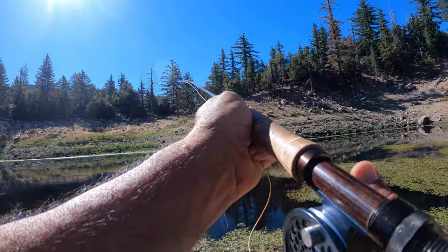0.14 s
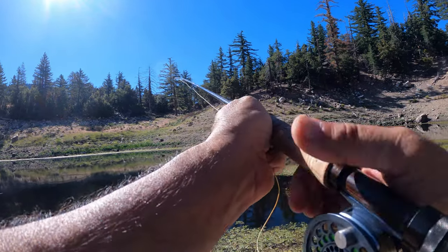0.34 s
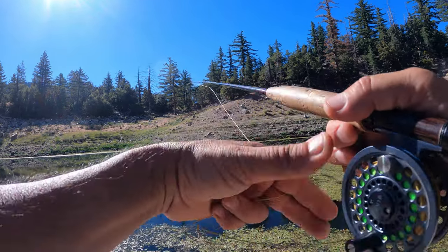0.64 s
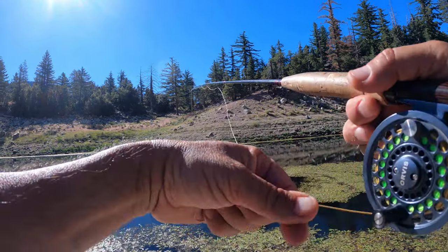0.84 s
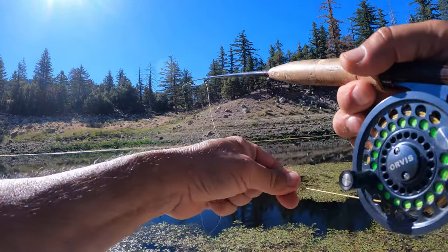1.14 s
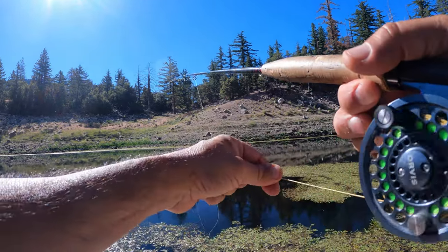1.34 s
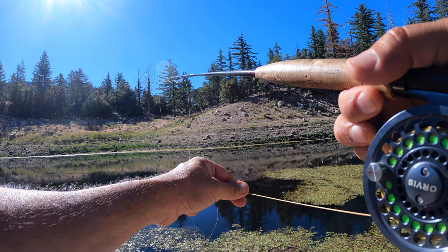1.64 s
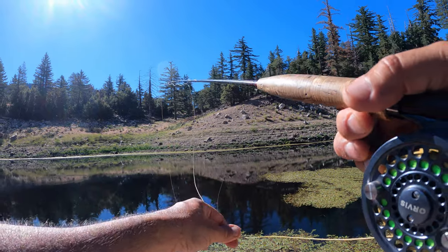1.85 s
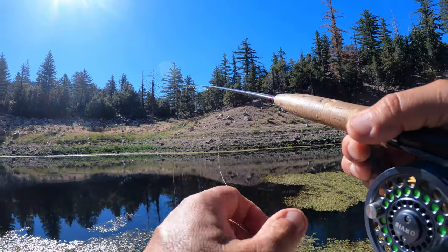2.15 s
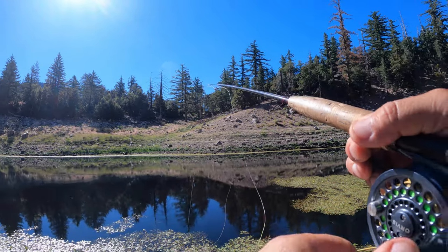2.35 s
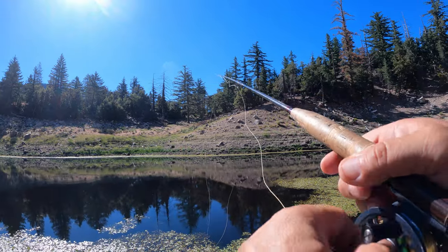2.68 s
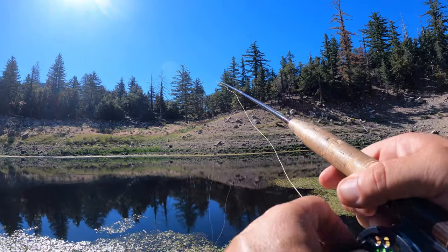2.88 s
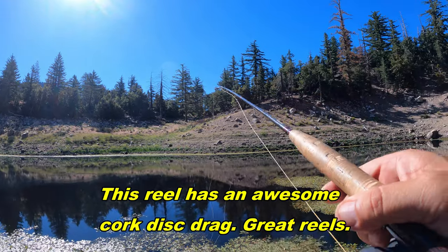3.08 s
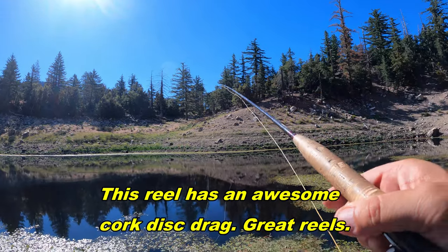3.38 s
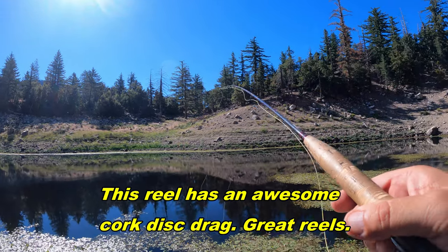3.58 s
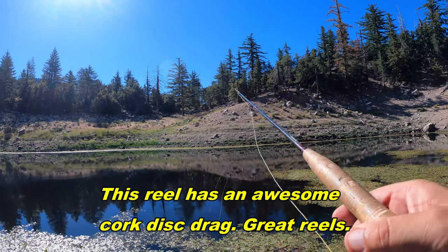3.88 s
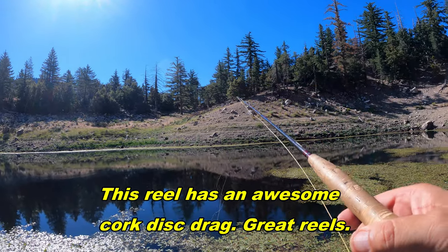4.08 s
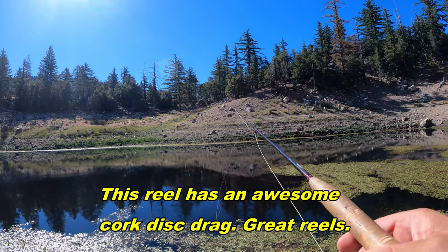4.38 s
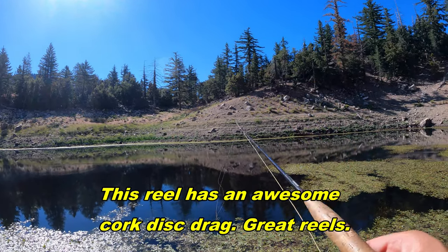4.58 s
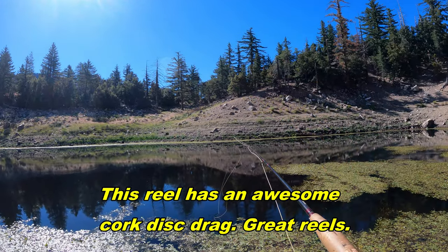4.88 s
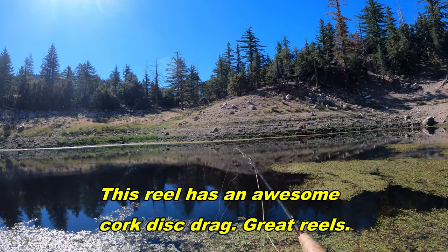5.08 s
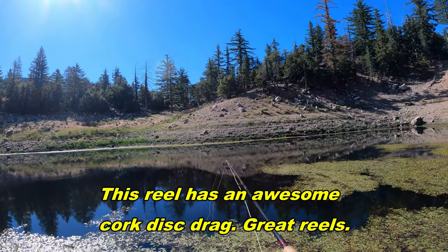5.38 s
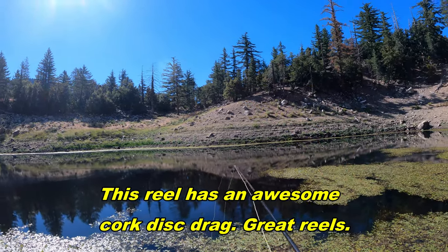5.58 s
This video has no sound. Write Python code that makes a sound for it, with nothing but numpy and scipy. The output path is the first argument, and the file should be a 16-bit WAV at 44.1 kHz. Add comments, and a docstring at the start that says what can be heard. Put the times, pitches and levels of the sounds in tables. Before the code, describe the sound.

Close metallic reel ticks, hand rubs and knocks lead into a bright rapid ratchet buzz of under two seconds, then soft rubbing by a quiet lake.

```python
"""A fly reel is handled close to a body-worn stereo microphone beside a quiet lake.
Line is pulled off against the pawl, then cranked back in: damped spring flicks and noise cracks tick on every
tooth, and speed-driven noise makes the spool whirr and the line chafe. Shaped noise makes the hands and line
sliding on the rod, the sleeves, the murmur of air and trees and the low thumps and puffs at the microphone.
Knocks on the reel frame ring a set of decaying modes, and rubbing line squeaks as brief unsteady tones."""
import sys
import numpy as np
from scipy import signal
from scipy.fft import rfft, irfft, next_fast_len
from scipy.io import wavfile
from scipy.ndimage import uniform_filter1d, map_coordinates

SR = 44100
rng = np.random.default_rng(int(sys.argv[2]) if len(sys.argv) > 2 else 0)


def unload_audio(sound):
    """Save the sound as a 16-bit wav file, at the path given as the first command line argument."""
    columns = np.transpose(np.atleast_2d(sound))
    # keep every value between -1 and 1, then stretch to whole-number steps
    steps = np.round(np.clip(columns, -1, 1) * 32767)
    wavfile.write(sys.argv[1], SR, steps.astype(np.int16))


N = 252693

# noise of a hard contact: (frequency [Hz], relative level [dB])
CRACK_SPECTRUM = [(600, -80), (1500, -35), (2500, -24), (4000, 5.5), (6000, 6), (8000, 0.5), (11500, -4),
                  (13500, -13), (16000, -29)]
# coarse noise of rubbing and of loose parts: (frequency [Hz], relative level [dB])
RUB_SPECTRUM = [(600, -27), (900, -16.5), (1400, -8), (2000, -3.5), (2750, -6.5), (3700, -1), (4400, 1.5),
                (5300, -6), (6100, -6), (7000, -16.5), (7700, -14.5), (9000, -24), (14000, -55)]
# soft noise of trees and of sleeves: (frequency [Hz], relative level [dB])
LEAF_SPECTRUM = [(100, -37), (170, 4.5), (260, 3.5), (450, 0), (700, -22), (1200, -16), (2500, -42),
                 (9000, -70)]
# left-right likeness of sounds close to the microphone: (frequency [Hz], likeness [0-1])
NEAR_LIKENESS = [(200, .8), (1700, .93), (3000, .78), (4300, .9), (8000, .8), (11000, .88), (13500, .3)]
# left-right likeness of the surroundings: (frequency [Hz], likeness [0-1])
FAR_LIKENESS = [(40, 0.7), (150, 0.71), (500, 0.61), (2000, 0.38), (10000, 0.38)]
# fast cranking, one push of the hand per half turn; surge is extra speed in mid-push, lean is how late (+) or
# early (-) the speed peaks: (start [s], surge [share], lean [share], relative pawl level [dB],
# relative whirr level [dB], relative chafe level [dB])
CRANK_PUSHES = [(3.1383, .05, .22, -16.5, -39, -47.5), (3.323, .25, -.13, -16.5, -40.5, -52),
                (3.4576, 0.29, -0.19, -16.5, -42, -52), (3.5744, 0.28, 0.18, -16.5, -40, -48.5),
                (3.6785, .12, -0.019, -16.5, -39.5, -48.5), (3.7998, 0.22, 0.047, -17, -42.5, -49.5),
                (3.9055, 0.1, -0.029, -18, -41, -51.5), (4.027, .2, 0.0044, -17.5, -40.5, -50.5),
                (4.142, 0.15, -0.11, -18, -41.5, -51.5), (4.2621, .18, .02, -17.3, -42.5, -52),
                (4.3815, 0.12, -0.13, -17.5, -42.5, -52.5), (4.498, 0.2, .06, -17, -45.5, -51.5),
                (4.6072, 0.13, -0.086, -18, -44.5, -55), (4.7181, 0.16, 0.24, -19, -43, -51.5)]
CRANK_END_S = 4.8279


def amp(db):
    """Decibels to gain."""
    return 10 ** (np.asarray(db) / 20)


def unit(x):
    """Scale to rms 1."""
    return x / np.sqrt(np.mean(x ** 2) + 1e-20)


def along(points, hz):
    """(Hz, value) points read on a log axis."""
    f, v = np.transpose(points)
    return np.interp(np.log(hz + 1), np.log(f + 1), v)


def wobble(rate):
    """A smooth random curve, rate knots a second."""
    knots = rng.standard_normal(int(N * rate / SR) + 4)
    return map_coordinates(knots, [np.arange(N) * rate / SR])


def filtered(x, response):
    """x times a response of frequency."""
    n = x.shape[-1]
    m = next_fast_len(n + 4096)
    hz = np.fft.rfftfreq(m, 1 / SR)
    return irfft(rfft(x, m) * response(hz), m)[..., :n]


def rush(spectrum, alike, patchy_db):
    """Stereo noise of rms 1 with drifting patches of colour."""
    z = signal.stft(rng.standard_normal((2, N)), nperseg=1024)[2]
    field = uniform_filter1d(rng.standard_normal(z.shape[1:]), size=4, axis=0)
    field = uniform_filter1d(field, size=9, axis=1)
    pair = signal.istft(z * amp(patchy_db * unit(field)), nperseg=1024)[1][:, :N]

    def mid_side(hz):
        # the less alike the two sides, the more of the difference signal
        turn = np.arccos(np.clip(along(alike, hz), -1, 1)) / 2
        return amp(along(spectrum, hz)) * [np.cos(turn), np.sin(turn)]
    mid, side = filtered(pair, mid_side)
    return unit(np.array([mid + side, mid - side]))


def add(track, s, sound):
    """Mix a short sound in at time s."""
    part = track[:, max(round(s * SR), 0):][:, :sound.shape[-1]]
    part += sound[..., :part.shape[-1]]


def fade(t, t60):
    """Free decay by 60 dB in t60 seconds."""
    return np.exp(-np.log(1000) * t / np.maximum(t60, 1e-4))


def swells(rows, bell):
    """Each (s, half length, dB, ..) stroke is a bell, squarer for a larger bell; one gain curve per dB column."""
    t = np.arange(N) / SR
    power = sum(amp(db)[:, None] ** 2 * np.exp(-2 * np.abs((t - s) / half) ** bell)
                for s, half, *db in rows)
    return np.sqrt(power)


def ringing(modes, t, t60, scatter_db=3, spread=0.25):
    """Modes at new strengths, reaching each side at a slightly different phase; peak 1."""
    hz, db, life = np.transpose(modes)[:, :, None]
    size, detune, phase, apart = rng.standard_normal((4, len(modes), 1))
    swing = 2 * np.pi * hz * (1 + 0.022 * detune) * t + np.pi * phase
    onset = 1 - np.exp(-t / 0.00014)
    decay = amp(db + scatter_db * size) * fade(t, t60 * life) * onset
    ring = np.array([(decay * np.sin(swing + ear * spread * apart)).sum(0) for ear in (-1, 1)])
    return ring / np.abs(ring).max()


def lakeside(air_db=-62, trees_db=-73, low_floor_db=-86, thump_db=-1.5):
    """A steady low murmur of open air and trees, with low thumps and puffs at the microphone."""
    # open air over the lake: (frequency [Hz], relative level [dB])
    air_spectrum = [(30, -21), (90, -25.5), (125, -16), (155, -3.5), (185, -6.5), (215, 1.5), (270, -14),
                    (450, -12), (800, -24.5), (1300, -15.5), (2400, -32), (6300, -31.5), (9000, -43),
                    (15000, -52)]
    # low thumps and puffs at the microphone; the first, at the very start, is a short low thump:
    # (time of the height [s], half length [s], relative level [dB])
    thump_strokes = [(0, 0.017, -45), (.13, .04, -62), (.34, .055, -59), (3.635, 0.047, -43.5),
                     (3.75, 0.09, -52), (4.135, 0.037, -49), (4.99, .028, -57.5), (5.72, .05, -65)]
    # low noise at the microphone: (frequency [Hz], relative level [dB])
    thump_spectrum = [(12, -13), (31, 4.5), (42, -6), (58, -14.5), (100, -29), (250, -43), (1000, -100)]
    air = amp(air_db) * rush(air_spectrum, FAR_LIKENESS, patchy_db=3.0)
    trees = amp(trees_db) * rush(LEAF_SPECTRUM, FAR_LIKENESS, patchy_db=4.5)
    thump_gain = amp(low_floor_db) + amp(thump_db) * swells(thump_strokes, bell=1.3)
    thumps = thump_gain * rush(thump_spectrum, FAR_LIKENESS, patchy_db=-1)
    return air + trees + thumps


def clothing(rustle_db=-1):
    """Sleeves rustle softly as the arms move, and something brushes the microphone body once, muffled."""
    # sleeves moving with the arms: (time of the height [s], half length [s], relative level [dB])
    sleeve_strokes = [(0, 0.34, -69), (1.1, 0.32, -64.5), (2.3, 0.32, -57.5), (5.55, 0.26, -59)]
    # brush against the microphone body: (time of the height [s], half length [s], level [dB])
    brush_strokes = [(1.856, .03, -51)]
    # muffled noise of the brush: (frequency [Hz], relative level [dB])
    brush_spectrum = [(71, -54), (120, -28), (226, 3.5), (542, -16.5), (955, -16), (1060, -28), (1220, -15),
                      (3000, -30), (3900, -57), (6600, -120)]
    sleeve_gain = amp(rustle_db) * swells(sleeve_strokes, bell=1.54)
    sleeves = sleeve_gain * rush(LEAF_SPECTRUM, FAR_LIKENESS, patchy_db=3.0)
    brush = swells(brush_strokes, bell=2.9) * rush(brush_spectrum, NEAR_LIKENESS, patchy_db=3.0)
    return sleeves + brush


def knocks(ring_db=-3.5, crack_t60=0.009, rattle_db=-17, tick_scatter_db=3, lowest_hz=950):
    """A hard contact cracks, and the hand-damped frame rings and rattles; fidgeting adds faint ticks."""
    # handle and fingers on the reel frame: (time [s], relative level [dB], base ring t60 [s],
    # crack relative to that level [dB])
    contacts = [(.026, -20, 0.006, -6), (.035, -18.5, 0.009, -6), (0.49, -43, 0.015, -14),
                (0.5142, -41.5, 0.022, -15), (1.0813, -35.5, 0.0098, -6), (1.4903, -38, .013, 3),
                (1.6825, -37.5, 0.019, -14), (1.824, -37.5, 0.013, -8), (2.3802, -12.5, 0.018, -13.5),
                (2.5937, -27.5, 0.023, -10), (2.726, -27.5, .012, -21), (2.8335, -28.5, 0.0079, -25),
                (2.9129, -25, .014, -14), (2.9148, -23, 0.022, -16), (2.9402, -27.5, 0.024, -5.5),
                (3.0082, -30, 0.0092, -14), (3.018, -24, 0.0064, -29), (3.824, -36, .015, -22),
                (4.8276, -19, 0.026, -15), (4.857, -26, .014, -11), (4.875, -27, 0.016, -29),
                (5.0487, -27.5, 0.028, -12), (5.0965, -33, 0.013, -21), (5.123, -29, 0.02, -22),
                (5.1379, -22, 0.024, -26), (5.2963, -32, 0.021, -25)]
    # modes of the reel frame: (frequency [Hz], relative level [dB], decay relative to the base t60 [ratio])
    frame_modes = [(1204, -20, 3.8), (1633, -8.5, 1.6), (1910, -11.5, 1.8), (2140, -21, 0.42),
                   (2690, -11.5, 1.4), (3196, -4, 0.85), (3920, -12.5, 1.1), (4240, -6, 0.85),
                   (4650, -4, 1.04), (5240, 7, 0.49), (6240, -4, 1.14), (7350, -5.5, 0.77),
                   (8780, -5, 0.54)]
    # fingers and slack line fidgeting on the rod: (start [s], end [s], tick rate [1/s], relative level [dB])
    fidget_spells = [(0.436, .6, 37, -53), (1.661, 1.79, 42.3, -44.5), (1.829, 1.891, 114, -41.5),
                     (2.5, 2.722, 48.2, -38), (3.722, 3.788, 130, -26), (4.788, 4.897, 96, -30.5),
                     (4.92, 5.342, 56.5, -43)]
    out, t = np.zeros((2, N)), np.arange(SR // 16) / SR
    grit = rush(CRACK_SPECTRUM, NEAR_LIKENESS, patchy_db=4.5)
    loose = rush(RUB_SPECTRUM, NEAR_LIKENESS, patchy_db=0)
    for s, db, t60, crack_db in contacts:
        now = slice(round(s * SR), round(s * SR) + len(t))
        crack = amp(crack_db) * grit[:, now] * fade(t, crack_t60)
        rattle = amp(rattle_db) * loose[:, now] * fade(t, 2 * t60)
        ring = amp(ring_db) * ringing(frame_modes, t, t60)
        add(out, s, amp(db) * (ring + crack + rattle))
    for start, end, rate, db in fidget_spells:
        for s in np.arange(start, end, 1 / rate):
            tick = ringing(frame_modes, t[:SR // 60], t60=.008)
            gain = amp(db + tick_scatter_db * rng.standard_normal())
            add(out, s + rng.random() / rate, gain * tick)
    # so small a frame radiates almost no bass
    return signal.sosfilt(signal.butter(2, lowest_hz, "highpass", fs=SR, output="sos"), out)


def sliding(rub_db=0, hiss_db=6.0, grain_db=1.27, uneven_db=1.47):
    """Skin and line rub over cork and rod in finely grained strokes."""
    # hands and line along the rod: (time of the height [s], half length [s], relative rub level [dB],
    # relative fine hiss level [dB])
    rod_strokes = [(.055, .015, -65, -79), (.175, 0.026, -74, -76), (.335, .02, -69.5, -69),
                   (.385, 0.028, -68, -69), (.56, 0.05, -59, -66.5), (.65, 0.04, -44.5, -66),
                   (.715, 0.074, -45.5, -73), (.795, .035, -44.5, -70), (1.02, 0.078, -53.5, -64),
                   (1.37, 0.17, -54.5, -64), (1.6, 0.13, -63.5, -65.5), (1.94, 0.054, -50, -65),
                   (2.165, 0.062, -51.5, -76), (2.37, .07, -53.5, -90), (2.55, 0.062, -45.5, -74),
                   (2.675, .05, -45, -60), (2.81, 0.081, -55, -78), (2.95, 0.023, -54, -71),
                   (3.035, 0.034, -51.5, -83), (4.98, 0.078, -56.5, -83), (5.14, 0.069, -55.5, -74),
                   (5.28, 0.076, -59, -82), (5.385, 0.033, -54.5, -57.5), (5.55, 0.093, -46.5, -61.5),
                   (5.72, 0.031, -49, -54)]
    # fine hiss of the strokes: (frequency [Hz], relative level [dB])
    hiss_spectrum = [(2000, -23), (4200, -7), (5200, 5.5), (6400, 7.5), (7800, -1), (8500, -1.5),
                     (9200, 1.5), (10600, -5.5), (12000, -5), (13300, -16), (15000, -22), (16000, -34)]
    rub, hiss = swells(rod_strokes, bell=1.51)
    grain = unit(amp(grain_db * wobble(500) + uneven_db * wobble(60)))
    coarse = rush(RUB_SPECTRUM, NEAR_LIKENESS, patchy_db=1.8)
    fine = rush(hiss_spectrum, NEAR_LIKENESS, patchy_db=1.2)
    return grain * (amp(rub_db) * rub * coarse + amp(hiss_db) * hiss * fine)


def pawl(teeth, level_db, rise_s, rebound_db, rebound_s, snap_db, snap_t60, plate_db, plate_t60):
    """Each tooth flicks the damped spring for a few cycles; it rebounds once and shakes its plate."""
    # modes of the plate that carries the pawl: (frequency [Hz], relative level [dB],
    # decay relative to plate_t60 [ratio])
    plate_modes = [(1770, -15, 1.4), (3610, -6.5, 1.6), (4350, -1.5, 0.48), (5400, -0.5, 0.97),
                   (6130, 7, 0.8), (7550, -13.5, 0.49), (9370, -2, 0.57), (11500, -8, 1.6),
                   (12150, -4.5, 0.74)]
    out, t = np.zeros((2, N)), np.arange(SR // 40) / SR
    grit = rush(CRACK_SPECTRUM, NEAR_LIKENESS, patchy_db=2.5)
    snaps = amp(snap_db) * np.ones(len(teeth))
    scatter = rng.standard_normal((len(teeth), 3))
    for (s, db, hz), snap, (lag, size, width) in zip(teeth, snaps, scatter):
        def flick(delay):
            age = np.maximum(t - delay, 0)
            u = age / (rise_s * np.exp(.07 * width))
            return u * np.exp(1 - u ** 2) * np.sin(2 * np.pi * hz * age)
        rebound = amp(rebound_db + 2 * size) * flick(rebound_s * np.exp(0.261 * lag))
        spring = flick(0) + rebound
        noise = grit[:, round(s * SR):][:, :len(t)]
        crack = snap * noise * fade(t, snap_t60) * (1 - np.exp(-t / 0.0002))
        plate = amp(plate_db) * ringing(plate_modes, t, plate_t60)
        add(out, s, amp(db + level_db) * (spring + crack + plate))
    return out


def winding_teeth(lean_shape=1.6):
    """Teeth met winding in, as (s, dB, Hz): each push drives half the wheel past the pawl at uneven speed."""
    # single ticks while the handle is eased round, before and after the fast cranking:
    # (time [s], relative level [dB], spring ring [Hz])
    eased_ticks = [(2.609, -18, 5500), (2.6534, -17.5, 5420), (2.7023, -24.5, 6540), (2.7086, -19.5, 5760),
                   (2.7645, -18.5, 5950), (2.8116, -16, 6000), (2.8455, -19, 5870), (2.8858, -17, 5790),
                   (3.0346, -26.5, 6540), (3.0554, -16.5, 5870), (3.086, -14.5, 5850), (3.1128, -14, 5750),
                   (4.8429, -23.5, 5633), (4.861, -21.5, 5386), (4.8874, -24, 6195)]
    # unevenly worn ratchet teeth, met in the same order on every turn: (strength [dB], spring ring [Hz])
    wheel_teeth = [(1.5, 5700), (0, 5220), (-0.5, 5370), (-3.5, 5170), (2, 5510), (2.5, 5500), (0, 5620),
                   (-5, 5800), (-1, 5550), (0.7, 5570), (0.5, 5460), (-2, 5500), (-4, 5600), (1.5, 5570),
                   (2, 5570), (0, 5660)]
    start, surge, lean, db = np.transpose(CRANK_PUSHES)[:4, :, None]
    length = np.diff(start, axis=0, append=CRANK_END_S)
    turned = np.linspace(0, 1, len(wheel_teeth) // 2, endpoint=False)
    surged = surge * np.sin(2 * np.pi * turned) / (2 * np.pi)
    # a larger lean_shape confines the early or late shift more closely to mid-push
    leaned = lean * np.sin(np.pi * turned) ** lean_shape / np.pi
    times = (start + length * (turned + surged + leaned)).ravel()
    tooth_db, hz = np.resize(wheel_teeth, (len(times), 2)).T
    cranked = np.column_stack([times, np.repeat(db, len(turned)) + tooth_db, hz])
    teeth = np.vstack([eased_ticks, cranked])
    return teeth[np.argsort(teeth[:, 0])]


def ratchet():
    """The pawl snaps sharply off the teeth one way and rides over them more smoothly the other."""
    # pawl dropping off a tooth as line is pulled out: (time [s], relative level [dB], spring ring [Hz],
    # relative snap level [dB])
    pulled_teeth = [(1.0599, -31, 5330, 4), (1.148, -39.5, 5500, 9.5), (1.2405, -28.5, 4200, -4),
                    (1.307, -22.5, 5360, -15), (1.356, -27.5, 4930, -3.5), (1.3937, -21.5, 5300, -23),
                    (1.433, -24.5, 4940, -5), (1.4697, -24, 4530, -14), (1.5073, -22, 4720, -7),
                    (1.5451, -18, 5200, -5.5), (1.5854, -15, 5960, -4.5), (1.6304, -18.5, 5340, -1.5)]
    teeth = np.array(pulled_teeth)
    pulled = pawl(teeth[:, :3], level_db=-3, rise_s=0.00046, rebound_db=-4.5, rebound_s=0.000875,
                  snap_db=teeth[:, 3] + 0.5, snap_t60=0.0071, plate_db=-3, plate_t60=0.0093)
    wound = pawl(winding_teeth(), level_db=-1.0, rise_s=0.00067, rebound_db=-13.5, rebound_s=0.001303,
                 snap_db=-7.0, snap_t60=0.0062, plate_db=-16.5, plate_t60=0.009)
    return pulled + wound


def squeaks(waver=0.023):
    """Sticking line sings for a moment at an unsteady pitch."""
    # rubbing line: (time of the height [s], half length [s], mean pitch [Hz], level [dB])
    squeak_strokes = [(2.5, 0.04, 2390, -56), (2.57, 0.0073, 1810, -44.5), (3.669, 0.019, 2250, -37.5)]
    t = np.arange(N) / SR
    drift = np.cumsum(1 + waver * wobble(350)) / SR
    return sum(amp(db) * np.exp(-((t - s) / half) ** 2) * np.sin(2 * np.pi * hz * drift)
               for s, half, hz, db in squeak_strokes)


def spool(whirr_db=0, chafe_db=1.0, tick_db=4, tick_t60=0.0068, lumpy_db=2.0, grain_db=1.5,
          run_up_s=0.048, run_down_s=0.08, edge_s=0.046, cruise_teeth_per_s=70.1,
          whirr_db_per_octave=10.5, chafe_db_per_octave=9):
    """The spool whirrs and the line chafes onto it, louder with speed and shaken by every pawl stroke."""
    # whirr of the spool: (frequency [Hz], relative level [dB])
    whirr_spectrum = [(1500, -35.5), (2700, -6.5), (3500, -4), (4400, 1), (5600, -2.5), (7100, -8.5),
                      (8200, -18.5), (9100, -12.5), (10200, -21.5), (12000, -23), (14000, -29),
                      (16000, -33)]
    # line chafing onto the spool: (frequency [Hz], relative level [dB])
    chafe_spectrum = [(600, -69), (900, -18.5), (1300, -2), (1600, -1.5), (2200, 0.5), (2700, -6.5),
                      (3500, -3.5), (5000, -41)]
    t, ticks = np.arange(N) / SR, winding_teeth()[:, 0]
    strokes = np.bincount(np.round(ticks * SR).astype(int), minlength=N)
    shaken = signal.fftconvolve(strokes, fade(t[:SR // 20], tick_t60))[:N]
    texture = unit(amp(lumpy_db * wobble(110) + grain_db * wobble(900)))
    grain = texture * amp(tick_db * (shaken - 0.14))
    # spool speed in octaves above the cruising tooth rate
    between = (ticks[1:] + ticks[:-1]) / 2
    octaves = np.interp(t, between, -np.log2(np.diff(ticks) * cruise_teeth_per_s))
    start, *_, push_whirr_db, push_chafe_db = np.transpose(CRANK_PUSHES)
    middle = (start + np.append(start[1:], CRANK_END_S)) / 2
    whirr = amp(whirr_db + np.interp(t, middle, push_whirr_db) + whirr_db_per_octave * octaves)
    chafe = amp(chafe_db + np.interp(t, middle, push_chafe_db) + chafe_db_per_octave * octaves)
    inside_s = np.minimum(t - start[0] + run_up_s, CRANK_END_S + run_down_s - t)
    spinning = np.clip(inside_s / edge_s + .5, 0, 1)
    whirring = whirr * rush(whirr_spectrum, NEAR_LIKENESS, patchy_db=3.5)
    chafing = chafe * rush(chafe_spectrum, NEAR_LIKENESS, patchy_db=4.0)
    return spinning * grain * (whirring + chafing)


def off_the_body(x, echo_db=-24, delay_s=.0046, scatter_db=-23, scatter_t60=0.12):
    """Arms and chest throw back one short echo and a faint scatter."""
    t = np.arange(SR // 16) / SR
    answer = rng.standard_normal((2, len(t))) * fade(t, scatter_t60) * (t > .001)
    answer *= amp(scatter_db) / np.linalg.norm(answer[0])
    add(answer, delay_s, np.array([amp(echo_db)]))
    return x + signal.fftconvolve(x, answer, axes=1)[:, :N]


def scene():
    """All layers share one level and phase offset between the ports; the left is weaker over most of the band."""
    # left minus right level: (frequency [Hz], level difference [dB])
    port_balance = [(200, -2.5), (1200, -2.5), (2400, -3.5), (4500, -3.5), (6000, -1.5), (9000, -1),
                    (13000, 1)]
    # phase by which the left port leads the right: (frequency [Hz], phase [rad])
    port_lead = [(100, 0.28), (1200, -0.53), (1900, -0.29), (2900, -1.33), (4200, -0.25), (5500, -0.26),
                 (8000, -0.32), (9200, -0.11), (12000, 0.5)]

    def place(hz):
        level_db, phase = along(port_balance, hz) / 2, along(port_lead, hz) / 2
        return np.array([amp(ear * level_db) * np.exp(1j * ear * phase) for ear in (1, -1)])
    steady = lakeside() + clothing() + sliding() + squeaks() + spool()
    struck = off_the_body(knocks() + ratchet())
    return filtered(steady + struck, place)


def record(dry, top_hz=16300):
    """The microphone chain cuts steeply above its band limit."""
    return filtered(dry, lambda hz: 1 / (1 + (hz / top_hz) ** 120))


dry = scene()
out = record(dry)
unload_audio(out)
```